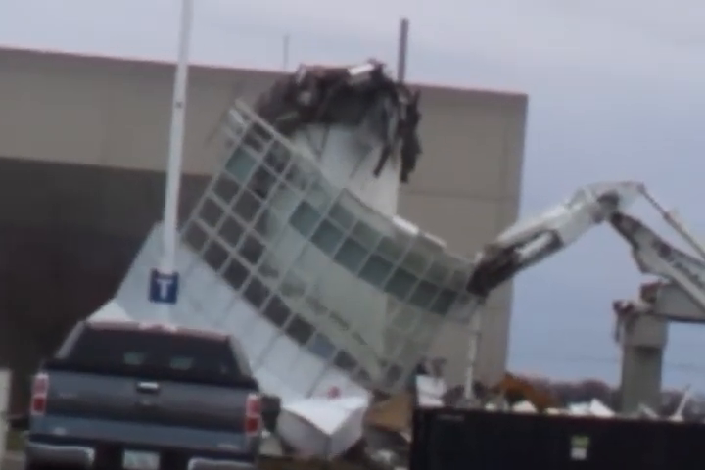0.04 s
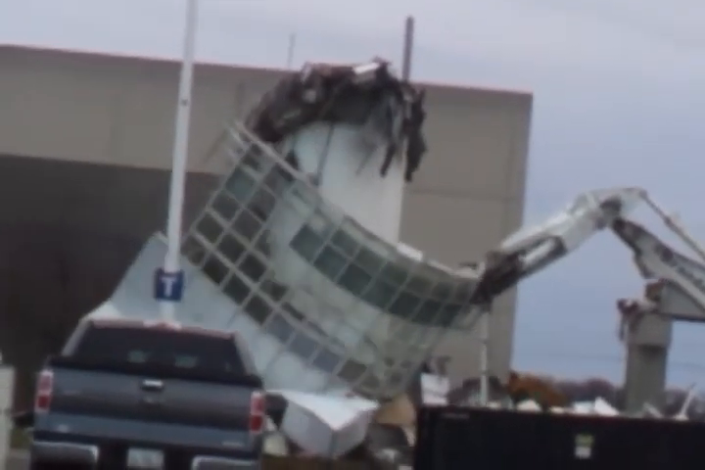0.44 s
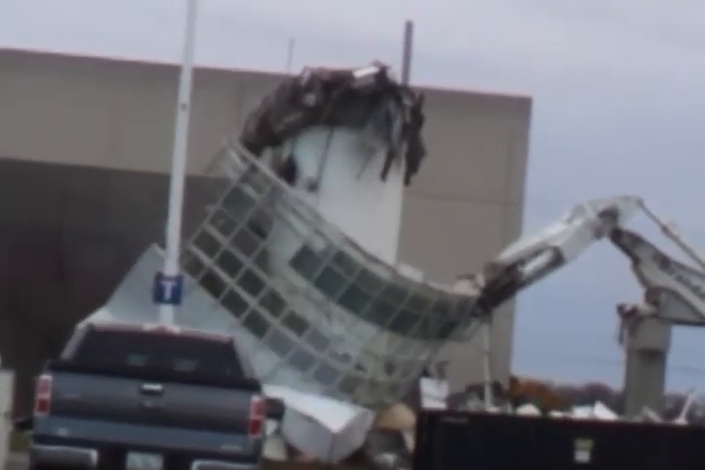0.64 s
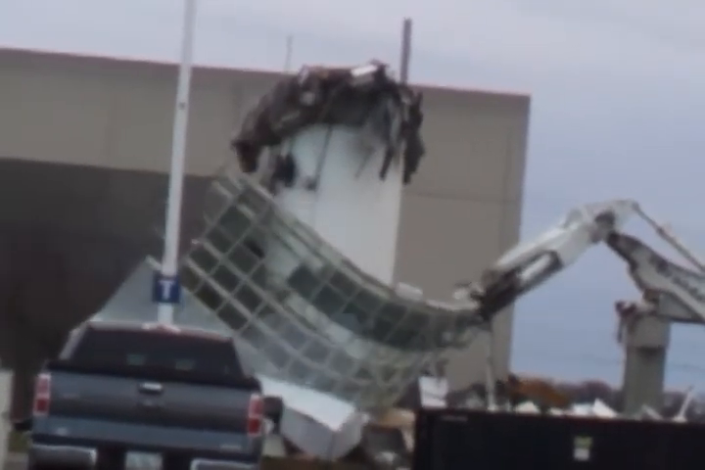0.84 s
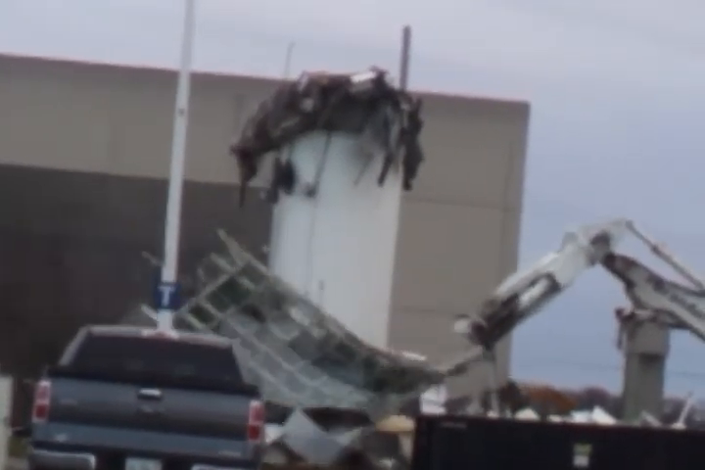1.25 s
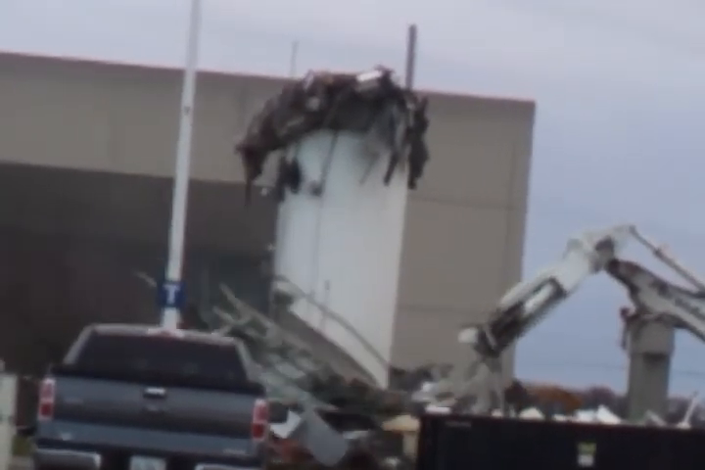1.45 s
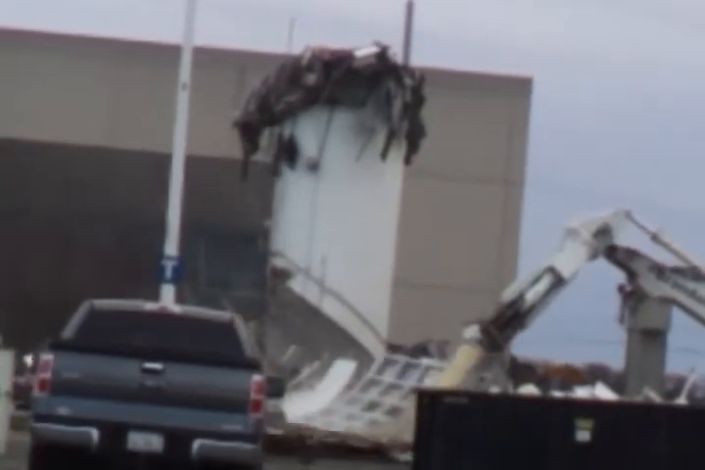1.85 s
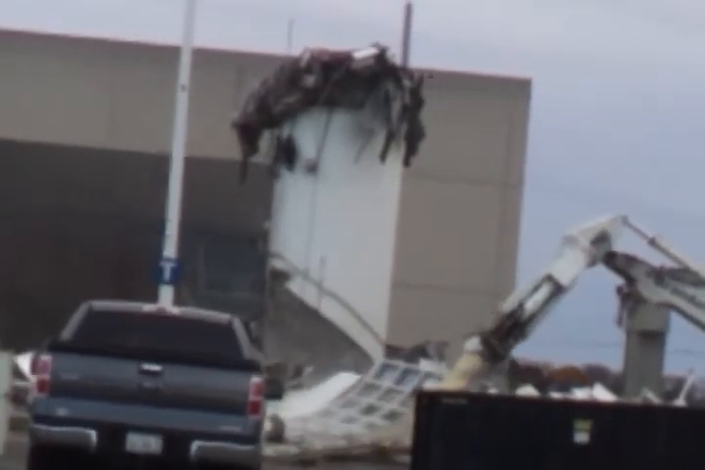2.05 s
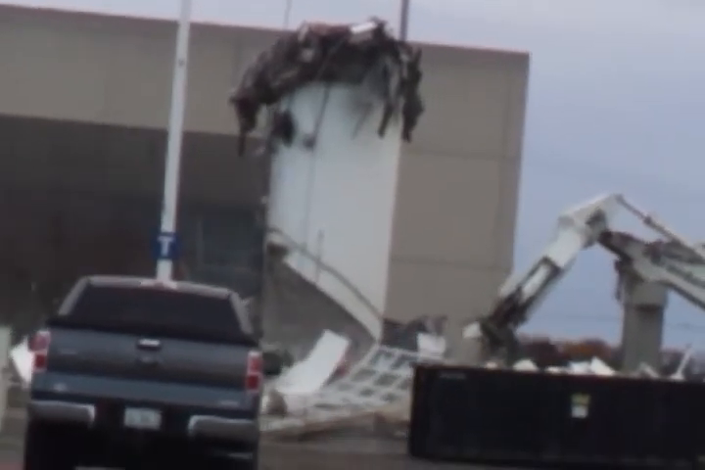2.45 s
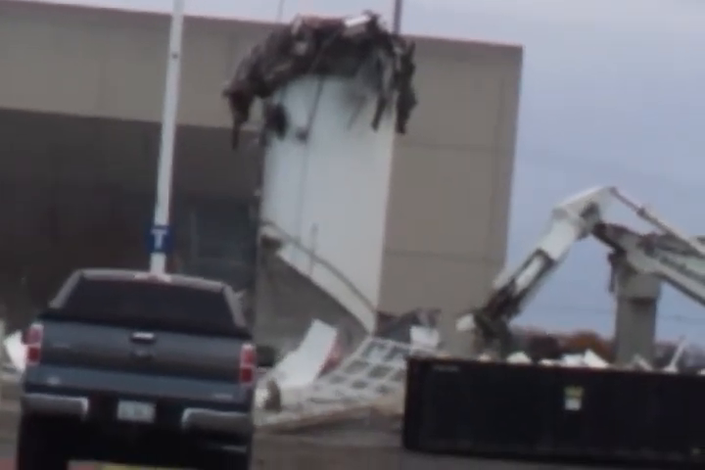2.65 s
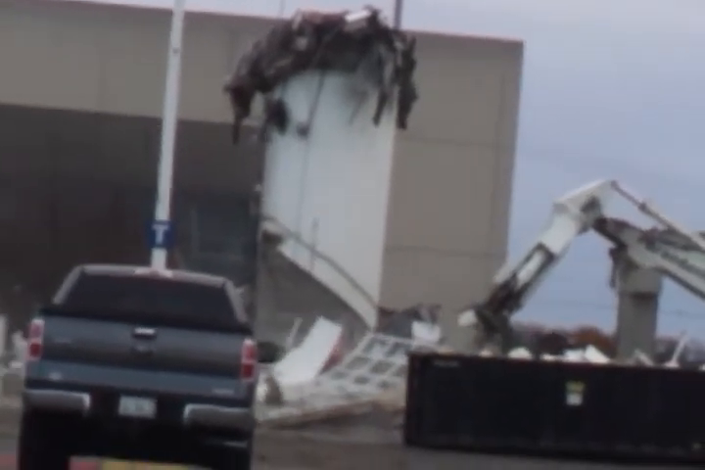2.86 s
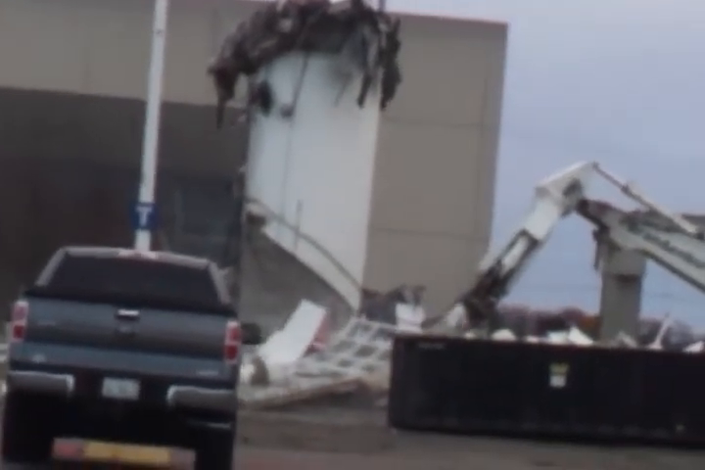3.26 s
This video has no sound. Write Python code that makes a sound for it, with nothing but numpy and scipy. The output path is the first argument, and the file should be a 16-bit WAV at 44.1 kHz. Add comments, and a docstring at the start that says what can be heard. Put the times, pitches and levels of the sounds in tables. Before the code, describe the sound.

A glass and metal wall collapses outdoors, first grinding and cracking, then landing in heavy crashes that overload the microphone. Shards and scrap clatter toward rest over an excavator's steady drone, with short echoes across the yard.

```python
"""Demolition of a glass wall

An excavator pulls down a curved wall of glass and metal framing, heard across a car park. Glass pours,
grinds and cracks while the frame sags and rumbles; then the wall lands in heavy crashes that overload
the microphone, and debris clatters to rest over the machine's drone. Most of the sound is impact noise:
random contacts, shaped by the spectrum and the damped resonances of each material."""
import sys
import numpy as np
from scipy import signal
from scipy.fft import rfft, irfft, next_fast_len
from scipy.io import wavfile
from scipy.ndimage import uniform_filter1d

SR = 44100
rng = np.random.default_rng(int(sys.argv[2]) if len(sys.argv) > 2 else 0)


def pcm_store(signal):
    """Save signal as 16-bit PCM."""
    levels = np.round(np.clip(np.atleast_2d(signal), -1, 1) * 32767)
    wavfile.write(sys.argv[1], SR, levels.astype(np.int16).T)


N = 149940
T = np.arange(N) / SR


def from_db(db):
    """Amplitude ratio: a factor of ten for every 20 dB."""
    return 10 ** (np.asarray(db) / 20)


def unit_rms(x):
    """Normalisation to unit mean power."""
    return x / np.sqrt(np.mean(x ** 2) + 1e-20)


def envelope(curve):
    """Amplitude envelope, interpolated in decibels between (time_s, level_db) rows."""
    return from_db(np.interp(T, *np.transpose(curve)))


def colour(x, spectrum):
    """Minimum-phase filtering: a folded cepstrum imposes the spectrum causally; the result has rms 1."""
    hz, db = np.transpose(spectrum)
    size = 2 * next_fast_len(N // 2 + 1)
    grid_hz = np.maximum(np.arange(size // 2 + 1) * SR / size, 1)
    magnitude = from_db(np.interp(np.log(grid_hz), np.log(hz), db))
    cepstrum = irfft(np.log(magnitude))
    cepstrum[1:size // 2] *= 2
    cepstrum[size // 2 + 1:] = 0
    return unit_rms(irfft(rfft(x, size) * np.exp(rfft(cepstrum)))[:N])


def contacts(per_s, spread_db):
    """Poisson impacts: a positive spread makes a few clicks stronger, a negative one a few weaker."""
    sizes = from_db(spread_db * np.minimum(rng.exponential(1, N), 4.5)) * rng.choice([-1, 1], N)
    return sizes * (rng.random(N) < per_s / SR)


def steady(x, span_s):
    """Division by the running rms holds a texture's slow level at 1 and keeps its grain."""
    power = uniform_filter1d(x * x, max(int(span_s * SR), 1))
    return x / np.sqrt(np.abs(power) + 1e-6)


def ring(clicks, hz, t60_s):
    """Damped oscillator: a unit impulse excites a decaying sine of height 1."""
    radius = from_db(-60 / (t60_s * SR))
    angle = 2 * np.pi * hz / SR
    return signal.lfilter([0, np.sin(angle)], [1, -2 * radius * np.cos(angle), radius ** 2], clicks + 1e-18)


def resonance(x, hz, bandwidth_hz):
    """Forced resonance passes a narrow band about the natural frequency."""
    return signal.lfilter(*signal.iirpeak(hz, hz / bandwidth_hz, fs=SR), x)


def burst(start_s, attack_s, hold_s, t60_s):
    """Transient envelope: linear attack, hold and exponential decay."""
    rise = np.clip((T - start_s) / attack_s, 0, 1)
    return rise * from_db(-60 * np.maximum(T - start_s - attack_s - hold_s, 0) / t60_s)


# Spectrum of the machine and the open air: frequency_hz, relative_db
DRONE_SPECTRUM = [(25, 13.5), (60, -5.5), (105, -5.5), (170, 10.5), (260, -19), (400, 2.5),
                  (1200, -17), (4000, -0.5), (8000, -53)]

def machine_drone():
    """Stationary coloured noise: the excavator and the open air make a constant background."""
    return from_db(-35.5) * colour(rng.standard_normal(N), DRONE_SPECTRUM)


# Reflections from the building and the yard: delay_s, gain_db
ECHO_PATHS = [(0.022, -18), (0.062, -9), (.118, -19), (0.189, -22.5)]

def yard_echoes(direct):
    """Discrete reflections: delayed, duller copies add to the direct sound."""
    dull = signal.sosfilt(signal.butter(1, 3500, fs=SR, output="sos"), direct)
    return direct + sum(from_db(db) * np.interp(T - delay, T, dull, left=0) for delay, db in ECHO_PATHS)


# Motion of the large panels and of the deep shudder: time_s, level_db
JOSTLE_LEVEL = [(0.0, -37), (0.28, -30.5), (0.38, -31), (0.79, -24), (1.14, -27), (1.38, -20.5),
                (1.73, -25.5), (1.86, -15), (1.95, -17.5), (2.2, -17), (2.34, -23), (2.53, -19), (2.7, -23),
                (3.02, -29), (3.23, -30.5), (3.4, -34.5)]
SHUDDER_LEVEL = [(0, -41), (.55, -37), (.9, -31), (1.05, -29), (1.3, -25.5), (1.5, -22.5), (1.6, -30),
                 (1.85, -27), (2.24, -30), (2.32, -14.5), (2.4, -24), (2.53, -22), (2.74, -35),
                 (2.95, -31.5), (3.26, -40), (3.4, -36)]
# Spectra of panels jostling, landing and shuddering: frequency_hz, relative_db
JOSTLE_SPECTRUM = [(25, -14), (50, -33), (70, -13), (100, 3.5), (125, 2), (143, -7.5), (173, 4),
                   (205, -8.5), (270, -5), (330, -18.5), (600, -23), (2000, -70)]
THUD_SPECTRUM = [(30, -31), (60, -17), (100, -3), (135, -5), (172, 7), (198, -5), (260, -7.5), (340, -16),
                 (600, -34), (2000, -61)]
SHUDDER_SPECTRUM = [(20, -21), (30, -5.5), (50, -2), (70, 0), (120, -24.5), (400, -72.5)]

def panel_rumble(surge):
    """Massive bodies vibrate at low frequencies: panels jostle and thud above a deep shudder."""
    low_cut = signal.butter(4, 22, "high", fs=SR, output="sos")

    def low_band(excitation, spectrum, span_s):
        return steady(colour(signal.sosfilt(low_cut, excitation), spectrum), span_s)

    jostle = low_band(contacts(per_s=260, spread_db=1.58), JOSTLE_SPECTRUM, span_s=0.04)
    thud = low_band(rng.standard_normal(N), THUD_SPECTRUM, span_s=0.013)
    shudder = low_band(rng.standard_normal(N), SHUDDER_SPECTRUM, span_s=0.047)
    return envelope(JOSTLE_LEVEL) * jostle + surge * thud + envelope(SHUDDER_LEVEL) * shudder


# Sliding of the sagging wall: time_s, level_db
GRIND_LEVEL = [(0, -42.5), (.15, -32), (.28, -30.5), (.42, -31), (.7, -31.5), (1.05, -34.5), (1.6, -37),
               (1.8, -58)]
# Resonances of the wall: pitch_hz, bandwidth_hz, relative_db
WALL_RESONANCES = [(641, 40, 0), (1229, 88, 1.5), (1850, 330, -7.5), (3197, 67, -1), (4585, 65, 3.5),
                   (5000, 130, -2)]

def wall_grinding():
    """Stick-slip friction: dense slips of glass against metal excite the wall's resonances."""
    slips = unit_rms(contacts(per_s=3000, spread_db=2.8))
    response = sum((-1) ** k * from_db(db) * resonance(slips, hz, bandwidth_hz)
                   for k, (hz, bandwidth_hz, db) in enumerate(WALL_RESONANCES))
    return envelope(GRIND_LEVEL) * steady(response, span_s=0.026)


def struck_metal(impacts, drive, spectrum, modes, ring_db):
    """Modal superposition: each contact crunches and excites every mode with a random strength."""
    clicks = steady(impacts, span_s=0.05)
    ringing = sum(from_db(db) * ring(clicks * drive * rng.standard_normal(N), hz, t60_s)
                  for hz, db, t60_s in modes)
    crunch = drive * steady(colour(clicks, spectrum), span_s=0.023)
    return crunch + from_db(ring_db) * np.std(drive) * unit_rms(ringing)


# Motion of the loose scrap: time_s, level_db
SCRAP_LEVEL = [(0.0, -36.5), (0.11, -38), (0.37, -34.5), (0.77, -36), (0.96, -42), (1.73, -40.5),
               (1.92, -39), (2.19, -23), (2.39, -25), (2.64, -28), (3.01, -30.5), (3.2, -33.5), (3.4, -40)]
# Spectrum of its contacts: frequency_hz, relative_db
SCRAP_SPECTRUM = [(300, -20), (700, 0), (1150, 6), (1600, 3), (2100, 0.5), (2800, -3), (3600, -7),
                  (5000, -10.5), (6000, -14.5), (8500, -25.5)]
# Its natural modes: pitch_hz, relative_db, t60_s
SCRAP_RESONANCES = [(1340, -8.5, .1), (1540, -12.5, 0.042), (1825, -3, 0.17), (2023, 4, .12),
                    (2228, 2.5, 0.12), (2394, 2.5, 0.18), (2631, 6, 0.071), (2826, 6.5, 0.072),
                    (3084, 4.5, 0.048)]

def scrap_clatter(surge):
    """Impact excitation: loose pieces of metal knock together and ring in high modes."""
    drive = np.hypot(envelope(SCRAP_LEVEL), surge)
    impacts = contacts(per_s=1300, spread_db=1.37)
    return struck_metal(impacts, drive, SCRAP_SPECTRUM, SCRAP_RESONANCES, ring_db=-3.5)


# Motion of the metal framing: time_s, level_db
FRAME_LEVEL = [(0.0, -42.5), (0.18, -40.5), (0.35, -37.5), (0.95, -31), (1.26, -30.5), (1.4, -29),
               (1.75, -28), (1.92, -18), (2.15, -20), (2.33, -31), (2.6, -32), (2.97, -29), (3.18, -35.5),
               (3.4, -40)]
# Spectrum of its contacts: frequency_hz, relative_db
FRAME_SPECTRUM = [(100, -20), (250, -16), (310, -1), (370, 3.5), (450, -1.5), (600, 3), (760, -5.5),
                  (1000, -9.5), (1500, -15.5), (3000, -38), (8000, -39.5)]
# Its natural modes: pitch_hz, relative_db, t60_s
FRAME_RESONANCES = [(394, 8.5, .06), (586.4, -5.5, 0.19), (825, -8, 0.2), (967, 4, 0.041),
                    (1119.1, 7, 0.045)]

def frame_clang(surge):
    """Impact excitation: lengths of framing collide and ring in low, quickly damped modes."""
    drive = np.hypot(envelope(FRAME_LEVEL), surge)
    impacts = contacts(per_s=800, spread_db=1.57)
    return struck_metal(impacts, drive, FRAME_SPECTRUM, FRAME_RESONANCES, ring_db=-8)


# Single shards striking the heap: start_s, pitch_hz, level_db
SHARD_STRIKES = [(.264, 4560, -29.5), (.929, 4470, -30), (1.365, 4750, -28.5), (1.421, 4660, -39),
                 (1.572, 4640, -32.5), (2.730, 7960, -40), (2.885, 2840, -38), (2.98, 4650, -30),
                 (3.078, 6470, -45), (3.102, 2790, -30), (3.114, 4700, -25.5), (3.299, 4520, -37)]

def shard_clinks():
    """Narrow-band resonance: a shard chatters briefly on the heap and rings at its own pitch."""
    clinks = 0
    for start_s, hz, db in SHARD_STRIKES:
        tone = steady(resonance(rng.standard_normal(N), hz, bandwidth_hz=47), span_s=0.0085)
        clinks += from_db(db) * burst(start_s, attack_s=0.0012, hold_s=0.014, t60_s=0.15) * tone
    return clinks


# Flow of broken glass: time_s, level_db
GLASS_LEVEL = [(0.0, -33), (0.12, -29), (0.26, -28.5), (0.43, -28.5), (1.1, -32.5), (1.71, -30),
               (1.88, -25), (2.23, -23), (2.38, -17), (2.65, -25), (2.98, -27.5), (3.2, -31), (3.4, -35.5)]
# Spectrum of the stream: frequency_hz, relative_db
GLASS_SPECTRUM = [(300, -17.5), (800, -13), (1250, -3.5), (1800, -10.5), (2500, -8.5), (2850, -4),
                  (3600, -8.5), (4200, -2.5), (4580, 1), (5050, -0.5), (5500, -7), (6000, -14),
                  (7500, -21.5), (8500, -33)]

def pouring_glass(surge):
    """Granular flow: crumbs click in a dense stream while larger shards tinkle at their own pitches."""
    drive = np.hypot(envelope(GLASS_LEVEL), surge)
    pitches_hz = rng.uniform(2335, 8300, 48)
    shards = sum(ring(contacts(per_s=700 / len(pitches_hz), spread_db=3.5), hz, t60_s=0.075)
                 for hz in pitches_hz)
    crumbs = contacts(per_s=3500, spread_db=1.33)
    stream = unit_rms(crumbs) + from_db(-9.5) * unit_rms(shards)
    return drive * steady(colour(stream, GLASS_SPECTRUM), span_s=0.11)


# Panes snapping: start_s, level_db
PANE_SNAPS = [(.480, -22.5), (.788, -30), (0.928, -30), (1.112, -23.5), (1.27, -20), (1.368, -38),
              (1.758, -28), (1.86, -20.5), (1.974, -13.5), (2.057, -18), (2.979, -29), (3.108, -30)]
# Spectrum of the fractures: frequency_hz, relative_db
FRACTURE_SPECTRUM = [(500, -18), (1500, -3), (3000, -2), (3800, 1.5), (4700, 8.5), (5600, -1), (6500, -13),
                     (8500, -27)]

def pane_cracks():
    """Brittle fracture: a pane snaps in a short, bright rush of clicks."""
    drive = sum(from_db(db) * burst(start_s, attack_s=0.0012, hold_s=0.011, t60_s=0.085)
                for start_s, db in PANE_SNAPS)
    fractures = colour(contacts(per_s=3500, spread_db=-1), FRACTURE_SPECTRUM)
    return drive * steady(fractures, span_s=0.016)


# Heavy pieces landing: start_s, hold_s, thud_db, frame_db, scrap_db, glass_db
LANDINGS = [(0.745, 0.01, -30, -42, -34, -35), (0.811, 0.026, -27, -28.5, -33.5, -41),
            (0.86, 0.023, -23.5, -29.5, -35.5, -44), (1.269, 0.0082, -16, -25, -39.5, -32),
            (1.353, 0.0077, -18, -37, -33, -45), (1.407, 0.024, -34, -35.5, -36, -47),
            (1.467, .025, -23.5, -27, -31.5, -54), (1.688, 0.02, -13, -25, -31.5, -26.5),
            (1.748, 0.016, -4, -15.5, -30, -17), (1.778, 0.031, -12.5, -13, -31, -23.5),
            (1.884, 0.017, -34.5, -12.5, -25.5, -24), (2.004, 0.024, -10.5, -15, -18.5, -18),
            (2.044, 0.028, -7.5, -30, -44.5, -40), (2.139, 0.033, -24, -27.5, -21, -23),
            (2.188, 0.02, -18.5, -17, -27.5, -21), (2.258, 0.059, -11, -11, -18.5, -29),
            (2.29, 0.031, -15.5, -16.5, -11, -16.5), (2.342, 0.019, -23, -20.5, -18.5, -25),
            (2.466, .04, -24.5, -18, -24, -38), (2.558, 0.052, -19.5, -28, -26, -34),
            (2.708, 0.005, -23, -30.5, -39, -36), (2.847, 0.023, -30, -29, -29, -35),
            (2.914, .03, -24, -27.5, -40.5, -44), (3.027, 0.066, -24, -29, -37, -34)]

def falling_wall():
    """Incoherent sources add in power: overlapping landings build a surge in each material."""
    starts_s, holds_s, thud_db, frame_db, scrap_db, glass_db = np.transpose(LANDINGS)

    def surge(levels_db, t60_s):
        bursts = (from_db(db) * burst(start_s, attack_s=0.0021, hold_s=hold_s, t60_s=t60_s)
                  for start_s, hold_s, db in zip(starts_s, holds_s, levels_db))
        return np.sqrt(sum(gain ** 2 for gain in bursts))

    panels = panel_rumble(surge(thud_db, t60_s=0.17))
    frame = frame_clang(surge(frame_db, t60_s=0.17))
    scrap = scrap_clatter(surge(scrap_db, t60_s=0.13))
    glass = pouring_glass(surge(glass_db, t60_s=0.18))
    return panels + frame + scrap + glass


def scene():
    """Linear superposition: the collapse, its echoes and the drone sum in one channel."""
    collapse = falling_wall() + pane_cracks() + shard_clinks() + wall_grinding()
    return (yard_echoes(collapse) + machine_drone())[None]


def record(dry):
    """Overload distortion: the loudest crashes clip in two stages, each followed by a low-pass filter."""
    bias, overload, ceiling = -0.036, 0.71, 0.74
    mic_band = signal.cheby2(14, 60, 9250, fs=SR, output="sos")
    top_cut = signal.ellip(10, 0.2, 80, 15800, fs=SR, output="sos")
    mic = signal.sosfilt(mic_band, np.clip(dry + bias, -overload, overload))
    return signal.sosfilt(top_cut, np.clip(mic, -ceiling, ceiling))


dry = scene()
out = record(dry)
pcm_store(out)
```